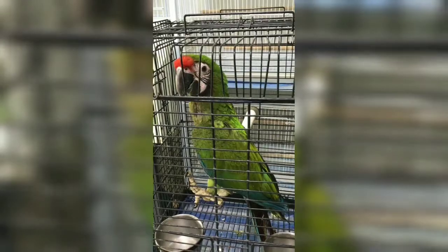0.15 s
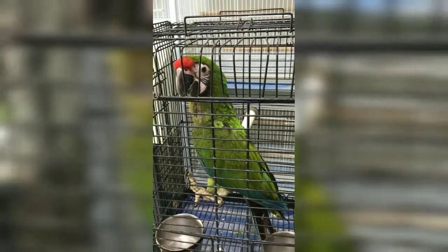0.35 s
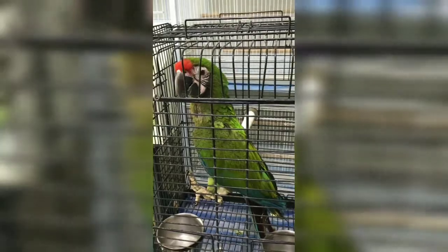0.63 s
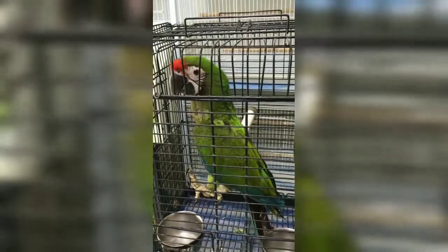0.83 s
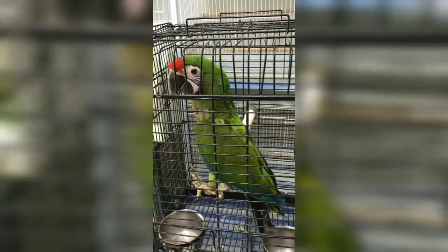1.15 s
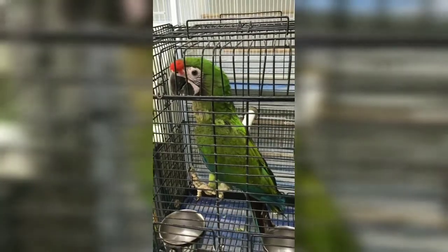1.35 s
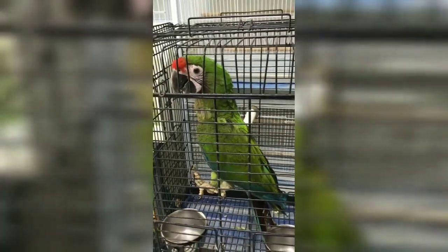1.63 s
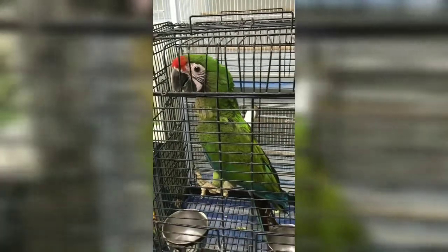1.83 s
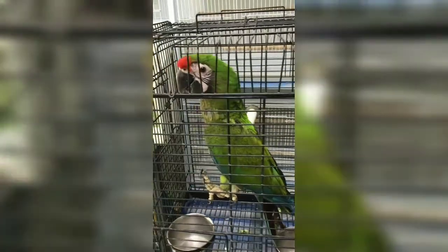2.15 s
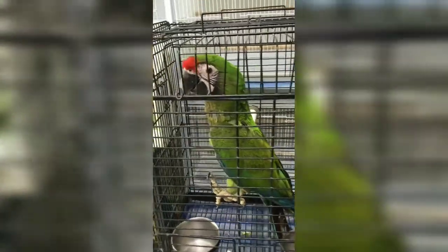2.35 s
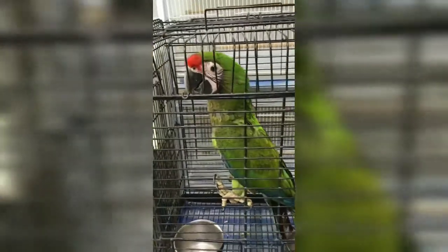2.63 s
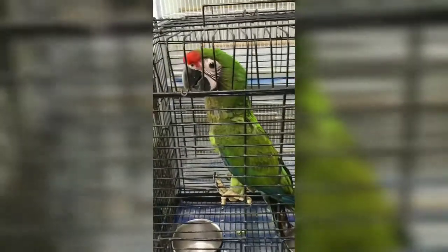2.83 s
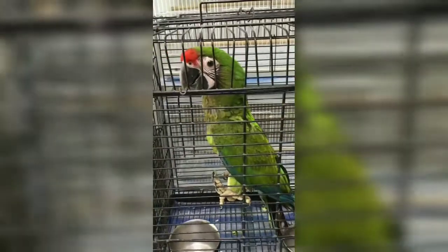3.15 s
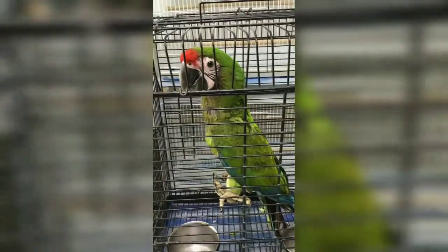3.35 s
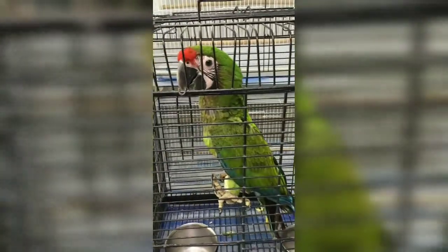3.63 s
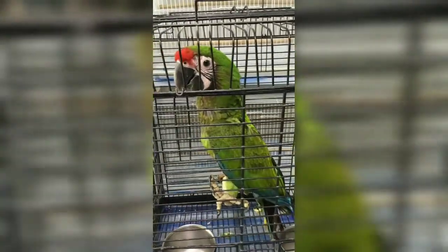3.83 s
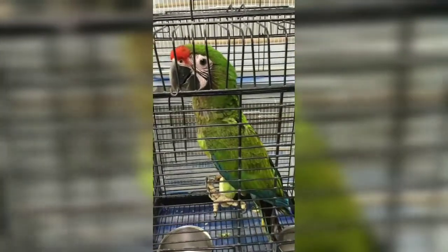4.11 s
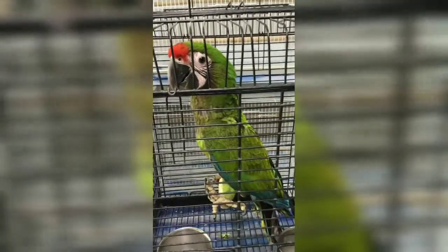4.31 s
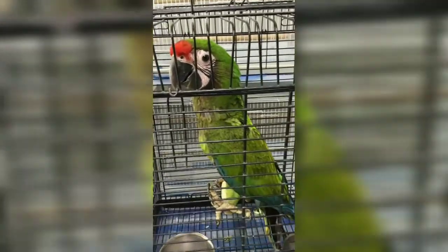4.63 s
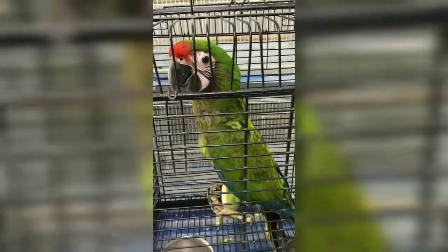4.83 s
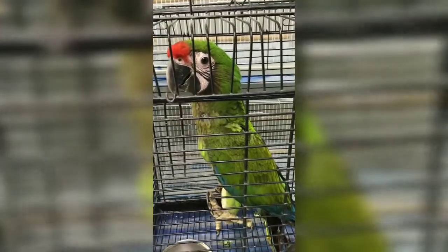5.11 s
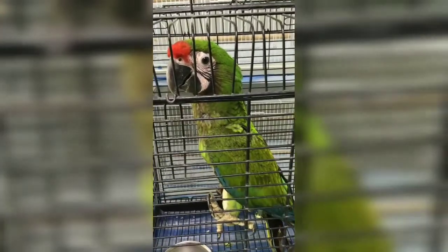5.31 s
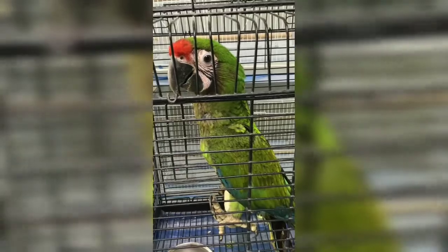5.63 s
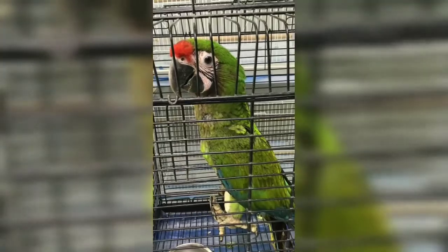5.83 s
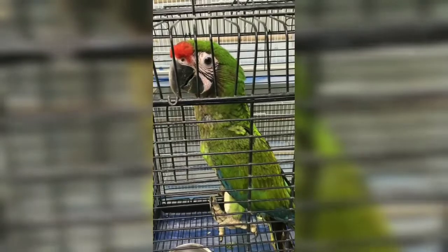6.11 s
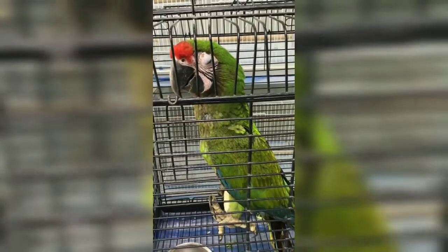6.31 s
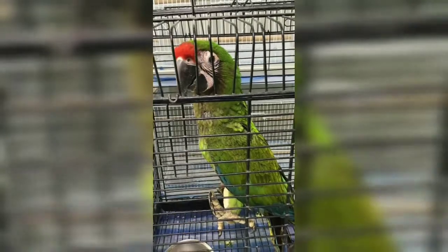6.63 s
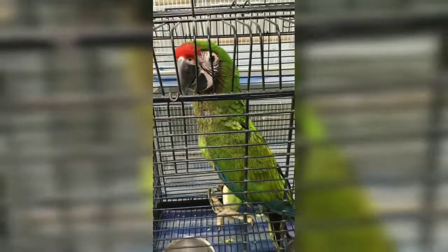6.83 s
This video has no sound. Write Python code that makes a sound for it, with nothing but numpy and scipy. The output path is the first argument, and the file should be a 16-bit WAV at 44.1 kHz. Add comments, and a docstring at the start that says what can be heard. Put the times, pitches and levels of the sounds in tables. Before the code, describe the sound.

After a brief overloaded burst, shrill parrot shrieks and rough macaw squawks ring around a hard-walled room with a low hum behind.

```python
"""A sudden, far too loud burst of room noise and bird calls comes first, then the level drops to normal.
The microphone stands in a hard-walled room with caged parrots. Shrill shrieks follow one another with
hardly a pause, and a macaw breaks in with harsh, low squawks; each voice is a buzzing syrinx and rushing
air, shaped by a throat. Behind them two motors hum and beat slowly, and a bird bumps about in its cage."""
import sys
import numpy as np
from scipy import signal
from scipy.fft import rfft, irfft, next_fast_len
from scipy.io import wavfile
from scipy.ndimage import map_coordinates

SR = 44100
rng = np.random.default_rng(int(sys.argv[2]) if len(sys.argv) > 2 else 0)


def dump_mix(stems):
    """Bounce the given channels to the path in sys.argv[1] as a 16-bit WAV at rate SR."""
    frames = np.atleast_2d(stems).T  # one column per channel
    limited = np.clip(frames, -1, 1)  # hard clip at full scale
    pcm = np.round(limited * 32767).astype(np.int16)
    wavfile.write(sys.argv[1], SR, pcm)


N = 306936


def amp(db):
    return 10 ** (np.asarray(db) / 20)


def unit(x):
    return x / np.sqrt(np.mean(x ** 2) + 1e-20)


def along(points, hz):
    """Read (Hz, value) points on a log frequency axis."""
    freqs, values = np.transpose(points)
    return np.interp(np.log(hz + 1), np.log(freqs + 1), values)


def wobble(rate, size):
    """A smooth random curve, rate knots a second."""
    return map_coordinates(rng.standard_normal(size + 4), [np.arange(size) * min(rate / SR, 1)], order=1)


def coloured(x, points):
    """Pass x through a (Hz, dB) response."""
    size = next_fast_len(len(x) + 4096)
    return irfft(rfft(x, size) * amp(along(points, np.fft.rfftfreq(size, 1 / SR))), size)[:len(x)]


def add(track, start, sound):
    """Mix a sound into the track at a start sample."""
    track[start:start + len(sound)] += sound[:max(len(track) - start, 0)]


def arch(start_s, swell_s, fade_s, edge_s):
    """First sample, soft on-off gate, swell still to come (1 to 0) and fade so far (0 to 1) of a call."""
    t = np.arange(int((swell_s + fade_s) * SR)) / SR
    gate = np.clip(np.minimum(t, t[-1] - t) / edge_s, 0, 1)
    return int(start_s * SR), gate, np.clip(1 - t / swell_s, 0, 1), np.clip((t - swell_s) / fade_s, 0, 1)


# The room's own noise. Each row: frequency in Hz, relative level in dB.
ROOM_TONE = [(25, -33), (70, 3), (150, -2), (300, -7), (700, -8), (1400, -10.5), (4000, -8.5), (8000, -26),
             (15000, -30.5)]

def room_tone():
    """A faint, steady rumble and hiss all around the microphone."""
    return amp(-47) * unit(coloured(rng.standard_normal(N), ROOM_TONE))


# The hum's overtones, from the second harmonic up. Each entry: relative level in dB.
MOTOR_OVERTONES = [-9, -16, -23.5, -27]

def motors(hum_hz=97.6, beat_s=1.965, in_step_s=4.01, drift_db=1.6):
    """Two motors hum in the background; their fundamentals beat, the overtones stay more even."""
    phase = 2 * np.pi * np.cumsum(hum_hz * (1 + .0031 * wobble(9.2, N))) / SR
    slip = 2 * np.pi * (np.arange(N) / SR - in_step_s) / beat_s
    hum = amp(-44.5) * np.sin(phase) + amp(-46.5) * np.sin(phase + slip)
    overtones = sum(amp(db + 1.8 * wobble(3, N)) * np.sin(k * phase + rng.uniform(0, 2 * np.pi))
                    for k, db in enumerate(MOTOR_OVERTONES, 2))
    return np.sqrt(2) * (amp(drift_db * wobble(18, N)) * hum + amp(-43) * overtones)


# A knock on a cage bar. Each row: start in seconds, level in dB, pitch in Hz, seconds to fall 60 dB.
BAR_TAPS = [(6.443, -36.5, 1013, 0.12)]

def cage_bar():
    """A lightly knocked bar rings briefly on one note."""
    track, t = np.zeros(N), np.arange(SR // 4) / SR
    for start_s, db, t60, hz in ((s, db, t60, hz) for s, db, hz, t60 in BAR_TAPS):
        add(track, int(start_s * SR), amp(db - 60 * t / t60) * np.sin(2 * np.pi * hz * t))
    return track


# Bumps in the cage. Each row: start in seconds, level in dB, seconds to fall 60 dB.
CAGE_BUMPS = [(1.754, -29.5, 0.071), (2.046, -26.5, 0.19), (2.113, -23.5, 0.16), (2.134, -16.5, 0.16),
              (2.183, -25, 0.067), (3.051, -37, 1), (5.303, -27.5, 0.17)]
# Their dull colour. Each row: frequency in Hz, relative level in dB.
BUMP_SPECTRUM = [(25, -43), (60, -11.5), (150, -3), (250, -13.5), (480, -7.5), (800, -22), (2500, -45)]

def cage_bumps(attack_s=0.0017):
    """A bird bumps its cage: soft, low knocks that die without ringing."""
    track, t = np.zeros(N), np.arange(SR // 3) / SR
    for start_s, db, t60 in CAGE_BUMPS:
        thud = unit(coloured(rng.standard_normal(len(t)), BUMP_SPECTRUM))
        add(track, int(start_s * SR), thud * amp(db - 60 * t / t60) * (1 - np.exp(-t / attack_s)))
    return track


# The ring of the hard walls. Each row: frequency in Hz, seconds to fall 60 dB.
WALL_DECAY = [(150, 0.69), (1000, 0.71), (2200, 0.64), (4200, 0.58), (8000, 0.61), (15000, 0.46)]

def in_room(calls, voice, wet_db):
    """Each call reaches the microphone directly, then off the walls, where the treble dies soonest."""
    track = np.zeros(N)
    for call in calls:
        start, sound = voice(call)
        hz, t, noise = signal.stft(rng.standard_normal(SR * 3 // 4), SR, nperseg=256)
        decay = amp(-60 * t / along(WALL_DECAY, hz)[:, None])
        tail = signal.istft(noise * decay, SR, nperseg=256)[1]
        response = amp(wet_db) * np.pad(tail / np.linalg.norm(tail), (SR // 300, 0))
        response[0] = 1  # the direct path
        add(track, start, signal.fftconvolve(sound, response / np.linalg.norm(response)))
    return track


# The macaw, heard a little more directly than off the walls. Each row: start, swell and fade in seconds,
# top pitch in Hz, relative level in dB, swell depth in dB, roughness (capped at 1), chest tone in dB.
MACAW_SQUAWKS = [ (0.13, 0.069, 0.09, 491, -40.5, 1, 0.24, -2),
                 (1.56, 0.2, 0.12, 478.3, -34.5, 27, 1.05, 2),
                 (1.925, 0.083, 0.032, 445, -23, 13, 0.34, -4.5),
                 (1.99, 0.11, 0.19, 538.7, -22, 2.5, 0.54, -7),
                 (2.935, 0.13, 0.15, 360.3, -56, 16, 1.15, 18.5),
                 (3.56, 0.45, 0.13, 606.2, -23.5, 41.5, 0.9, -3.5),
                 (4.03, 0.084, 0.17, 520.6, -30, 15, 0.72, -3),
                 (4.39, 0.095, 0.2, 543.4, -41.5, 2, 1.04, 1.5),
                 (4.94, 0.27, 0.082, 560.4, -27.5, 32.5, 0.8, 1),
                 (5.2, 0.081, 0.14, 635.6, -24.5, 4, 0.72, -4.5),
                 (5.44, 0.235, 0.135, 565.6, -27, 15, 0.89, -2.5), ]
# Its wide throat. Each row: frequency in Hz, gain in dB.
MACAW_THROAT = [(150, -27), (330, -8), (480, -13), (680, -4.5), (950, -5.5), (1250, -3), (1650, 1),
                (2150, 1.5), (2700, -1), (3600, -3), (4900, -6.5), (5800, -15), (6700, -20.5),
                (12000, -35.5)]

def squawk(call, fade_db=14, flutter_db=2.0, sag=0.14, crest_shape=1.3):
    """Uneven syrinx pulses, each with a puff of air, ring the throat; one swell of effort drives it all."""
    start_s, swell_s, fade_s, top_hz, level_db, swell_db, rough, chest_db = call
    start, gate, early, late = arch(start_s, swell_s, fade_s, edge_s=0.044)
    n = len(gate)
    # away from the crest the voice is quieter, lower, rougher and more from the chest
    eased_db = swell_db * early ** crest_shape + fade_db * late ** crest_shape
    off_crest = (early + late) ** crest_shape
    pitch = top_hz * (1 - sag * off_crest + .025 * rough * wobble(35, n))
    rough = np.clip(rough + .298 * off_crest, .15, 1)
    chest_db = chest_db + .43 * eased_db
    waver = rough * (.075 * wobble(75, n) + .04 * wobble(330, n))
    phase = 2 * np.pi * np.cumsum(pitch * (1 + waver)) / SR
    # each partial swells and shrinks on its own as the folds flap
    pulses = unit(sum(amp(4 * wobble(55, n)) * np.cos(k * phase + rng.normal(0, 1.2))
                      for k in range(1, 27)))
    # strong and weak pulses alternate chaotically: a growl between the harmonics
    growl = .9 * wobble(50, n) * np.cos(phase / 2) + .35 * wobble(300, n)
    pulses = unit(pulses * (1 + rough * growl))
    puffs = .5 * rough * unit(rng.standard_normal(n) * (1 + np.cos(phase)))
    voice = unit(coloured(pulses + puffs, MACAW_THROAT))
    chest = coloured(voice, [(800, 2.0), (1150, -2.5), (1900, -24), (3000, -64)])
    envelope = gate * amp(level_db - eased_db + flutter_db * wobble(170.5, n))
    return start, envelope * (voice + (amp(chest_db) - 1) * chest)


def beak(voice, bright_db):
    """A wider beak tips the balance from the lowest harmonics toward the upper ones."""
    treble = coloured(voice, [(6350, -38), (6900, 1)])
    low = coloured(voice, [(2300, -7.5), (3100, -42)])
    high = coloured(voice - treble, [(4300, -16), (5200, -2.5)])
    tilt_db = .92 * np.clip(bright_db, -15, 6)
    body = voice - treble + (amp(-tilt_db) - 1) * low + (amp(tilt_db) - 1) * high
    return unit(body) + amp(bright_db - 12) * unit(treble)


# The shrieks, more distant, with more wall sound. Each row: start, swell and fade in seconds, top pitch
# in Hz, opening rise and final fall as shares of that pitch, relative level in dB, swell depth in dB,
# brightness in dB, odd harmonics in dB, roughness from 0 to 1.
PARROT_SHRIEKS = [ (0.245, 0.046, 0.061, 925, 0.1, 0, -27, 3, -16, -38, 0.08),
                  (0.525, 0.037, 0.081, 888, 0.16, 0.4, -38, 2, 3, 4, 0.95),
                  (0.598, 0.096, 0.13, 980, 0.03, 0.18, -27, 5, -1, -8, 0.64),
                  (0.775, 0.12, 0.065, 1016, 0, 0.11, -21.5, 5, 3, -17.5, 0.31),
                  (1.005, 0.08, 0.029, 930.6, 0.15, 0, -20.5, 9, 0, -8.5, 0.2),
                  (1.278, 0.11, 0.078, 989, 0.06, 0.07, -21, 9, 1, -10, 0.26),
                  (1.74, 0.05, 0.14, 1066, 0, 0.1, -18, 4, 1.5, -12, 0.47),
                  (2.335, 0.059, 0.061, 977, 0.15, 0.25, -28.5, -5, 1.5, -9, 0.57),
                  (2.45, 0.051, 0.12, 972, 0, 0.06, -23, 0, -5, -23, 0.65),
                  (2.595, 0.032, 0.15, 1065, 0.02, 0.14, -26.5, 6, 2.5, -10, 0.55),
                  (2.725, 0.056, 0.079, 1016, 0, 0.12, -22, -1, -2, -8.5, 0.6),
                  (2.935, 0.051, 0.1, 1050, 0.05, 0.09, -20, 7.5, 1.5, -9.5, 0.39),
                  (3.085, 0.083, 0.066, 1069, 0.05, 0.07, -21.5, 3.5, -1, -31, 0.63),
                  (3.215, 0.039, 0.034, 1062, 0.01, 0.05, -19, 8, 0, -7, 0.15),
                  (3.31, 0.0242, 0.11, 1056, 0.1, 0.05, -36.5, 3, 0, 5, 0.25),
                  (3.712, 0.097, 0.17, 1101, 0.03, 0.07, -19.5, 11.5, 0, -33, 0.29),
                  (4.02, 0.058, 0.043, 1025, 0.05, 0, -23.5, -2, -2, -25, 0.08),
                  (4.19, 0.047, 0.088, 1053, 0, 0.05, -26, 10, -9.5, -21, 0.42),
                  (4.385, 0.16, 0.12, 1094, 0.07, 0.19, -23.5, 9.5, 4.5, -12.5, 0.42),
                  (4.625, 0.062, 0.2, 933, 0.04, 0.21, -27, 8, 0.5, -15, 0.69),
                  (4.915, 0.15, 0.11, 1083, 0.02, 0.1, -16.5, 12, 1.5, -23, 0.5),
                  (5.205, 0.036, 0.084, 1032, 0.15, 0.04, -24, 9, -1, -23, 0),
                  (5.32, 0.053, 0.072, 1022, 0, 0.03, -22.5, 5, -1.5, -9, 0.25),
                  (5.495, 0.059, 0.24, 1067, 0.06, 0.16, -26, 13, 2.5, -33, 0.17),
                  (5.93, 0.04, 0.055, 940, 0.15, 0.08, -32.5, -5, 0.5, -5, 0.6),
                  (6.0, 0.11, 0.12, 1060, 0.02, 0, -21, 13, -1.5, -15.5, 0.45),
                  (6.2, 0.044, 0.115, 1091, 0.01, 0.22, -24, 11, 3, -34, 0.47),
                  (6.43, 0.065, 0.065, 1025, 0.05, 0.21, -26.5, 5, -14.5, -12, 0.6),
                  (6.52, 0.08, 0.1, 1153, 0.03, 0.14, -19, 4.5, 1.5, -15, 0.29),
                  (6.88, 0.11, 0.06, 962, 0.06, 0.2, -25.5, 1.5, -3, -12, 0.5), ]
# The parrot's small throat. Each row: frequency in Hz, gain in dB.
PARROT_THROAT = [(900, -50), (1450, -13.5), (1950, -7.5), (2250, -5), (2650, -5), (3300, 4), (4100, 4),
                 (5000, 2.5), (6200, -5.5), (6750, -14), (7800, -16.5), (10200, -25.5), (11800, -34.5),
                 (15000, -41)]

def shriek(call, fade_db=10.5, flutter_db=2.1, scoop=0.1):
    """The syrinx buzzes near 1 kHz, mostly on even harmonics; pitch and level arch together."""
    start_s, swell_s, fade_s, top_hz, rise, fall, level_db, swell_db, bright_db, odd_db, rough = call
    start, gate, early, late = arch(start_s, swell_s, fade_s, edge_s=0.011)
    n = len(gate)
    pitch = top_hz * (1 - rise * early ** 2 - fall * late ** 1.3 + .00566 * wobble(35, n))
    arch_db = level_db - swell_db * early ** 2 - fade_db * late ** 2
    # away from the crest the voice is hoarser, with more of the odd harmonics
    off_crest = (early + late) ** 2
    odd_db = odd_db + 13.5 * off_crest
    rough = np.clip(rough + .16 * off_crest, .1, 1)
    waver = (.005 + .04 * rough) * wobble(140, n) + .045 * rough * wobble(560, n)
    # the pitch scoops upward and the voice swells as the pressure builds
    slack = np.exp(-np.arange(n) / SR / .013)
    phase = 2 * np.pi * np.cumsum(pitch * (1 + waver - scoop * slack)) / SR
    tone = sum(amp(odd_db * (k % 2)) * np.sin(k * phase + rng.uniform(0, 2 * np.pi))
               for k in range(1, 16))
    tone = tone * (1 + rough * wobble(480, n))  # cycles of uneven strength smear each harmonic
    # air tears through once a cycle, and takes over in the treble
    breath = rng.standard_normal(n) * (1 + .17 * np.cos(phase))
    rasp = coloured(breath, [(2600, 3.0), (4000, -4.5), (6200, 2), (8000, 16)])
    voice = coloured(tone + 1.34 * np.sqrt(rough) * rasp, PARROT_THROAT)
    envelope = gate * (1 - slack) * amp(arch_db + flutter_db * wobble(150, n))
    return start, envelope * beak(voice, bright_db)


def scene():
    """One microphone hears the birds over the motors, the cage and the room tone."""
    parrots = amp(-1) * in_room(PARROT_SHRIEKS, shriek, wet_db=1.5)
    macaw = amp(10.5) * in_room(MACAW_SQUAWKS, squawk, wet_db=-1.5)
    return (parrots + macaw + motors() + cage_bumps() + cage_bar() + room_tone())[None]


# The overall level at the opening. Each row: time in seconds, gain in dB.
OPENING_GAIN = [(0.1955, -70), (0.1965, 20), (0.249, 20), (0.251, 2), (0.275, 14), (0.295, 20), (0.381, 20),
                (0.382, 0)]

def record(dry, top_hz=15550):
    """The level leaps and drops at the opening; peaks round off at full scale; the band ends steeply."""
    gain_db = np.interp(np.arange(N) / SR, *np.transpose(OPENING_GAIN))
    driven = dry * amp(gain_db)
    rounded = driven / (1 + driven ** 6) ** (1 / 6)
    return irfft(rfft(rounded) * (np.fft.rfftfreq(N, 1 / SR) < top_hz), N)


dry = scene()
out = record(dry)
dump_mix(out)
```